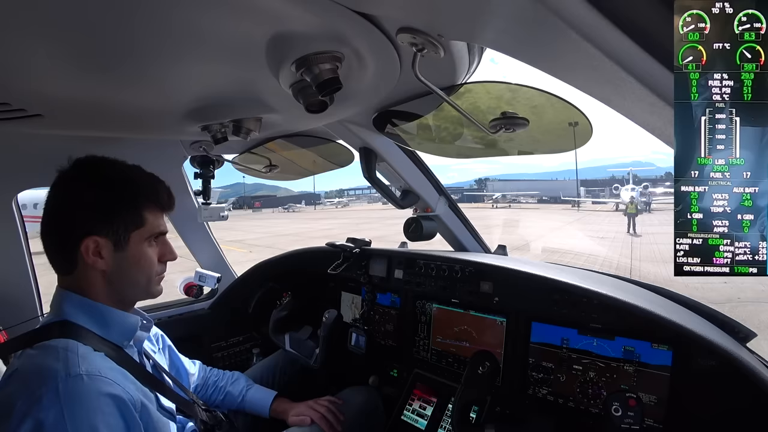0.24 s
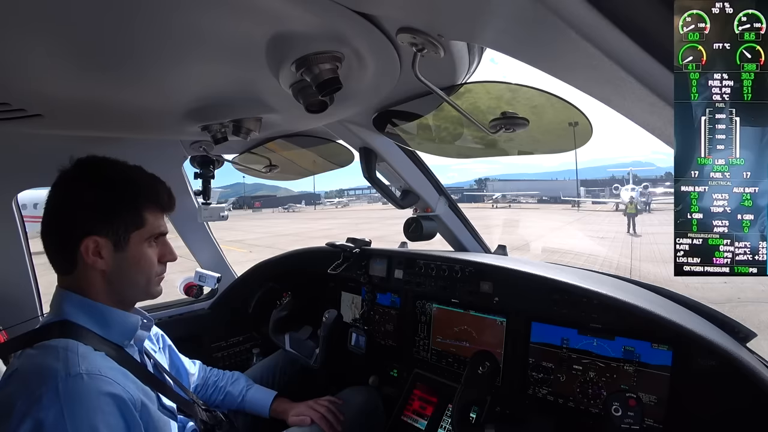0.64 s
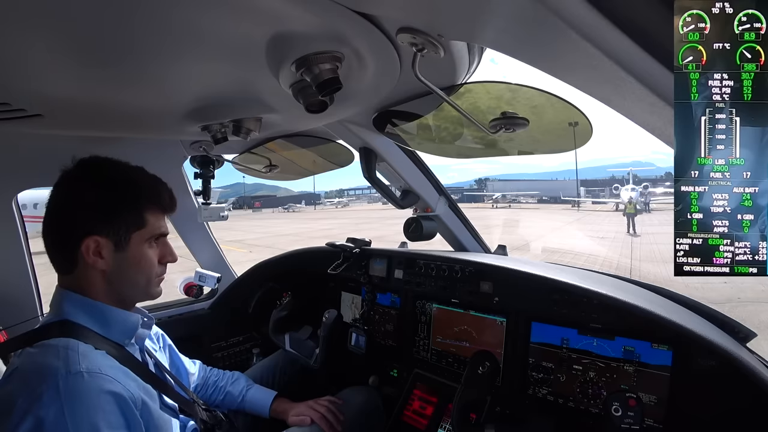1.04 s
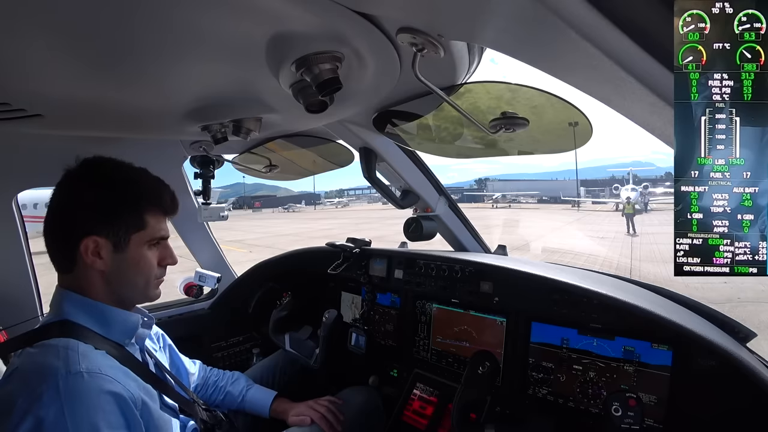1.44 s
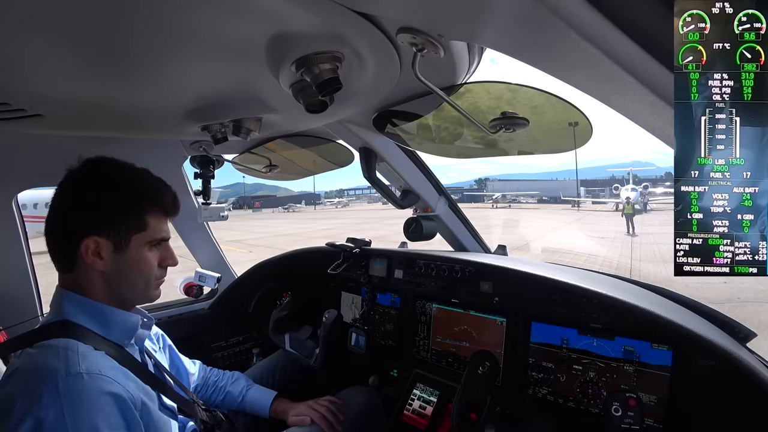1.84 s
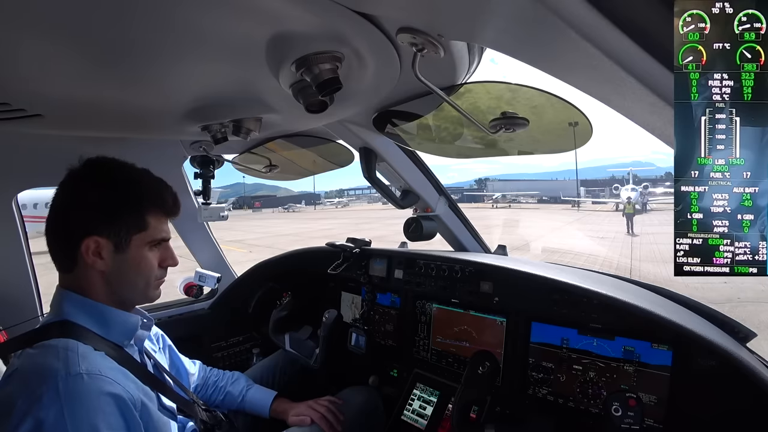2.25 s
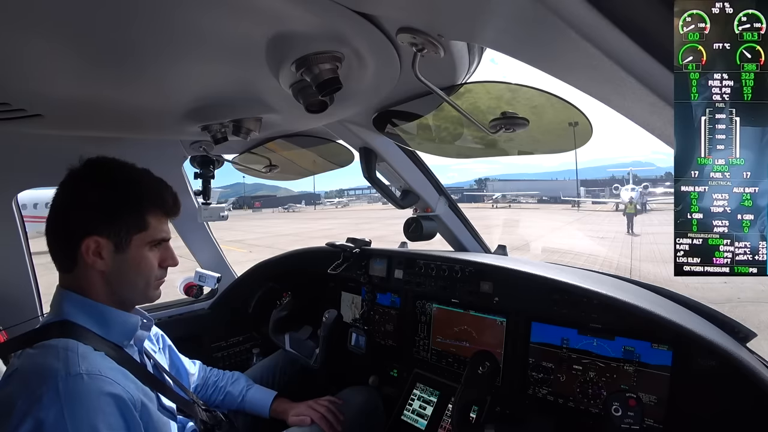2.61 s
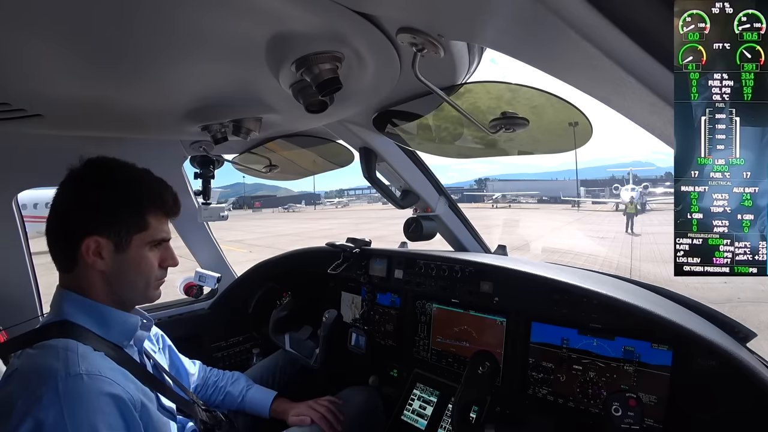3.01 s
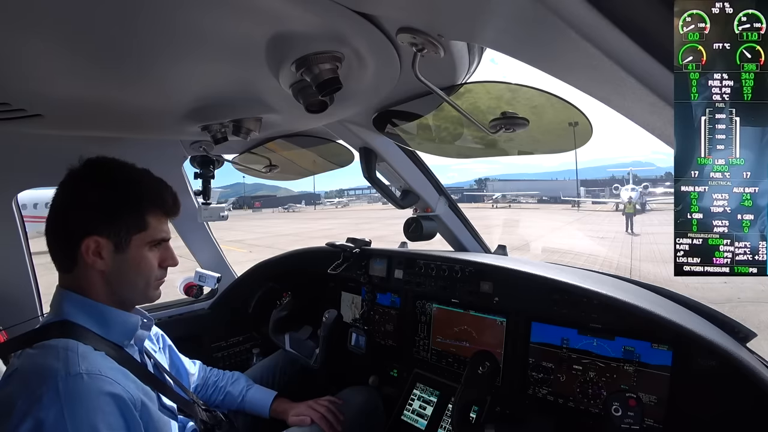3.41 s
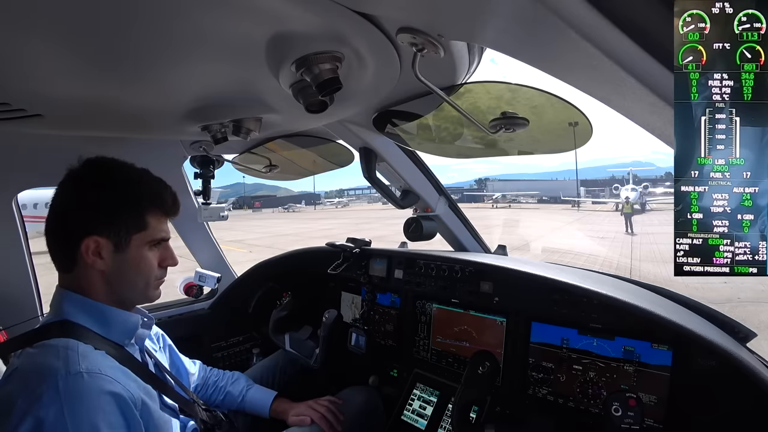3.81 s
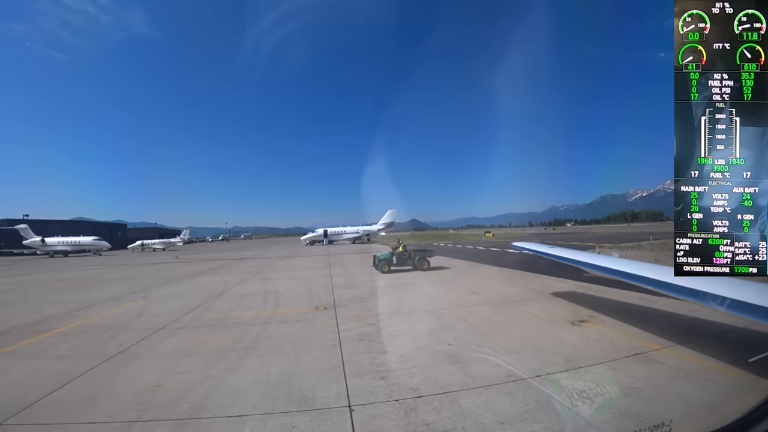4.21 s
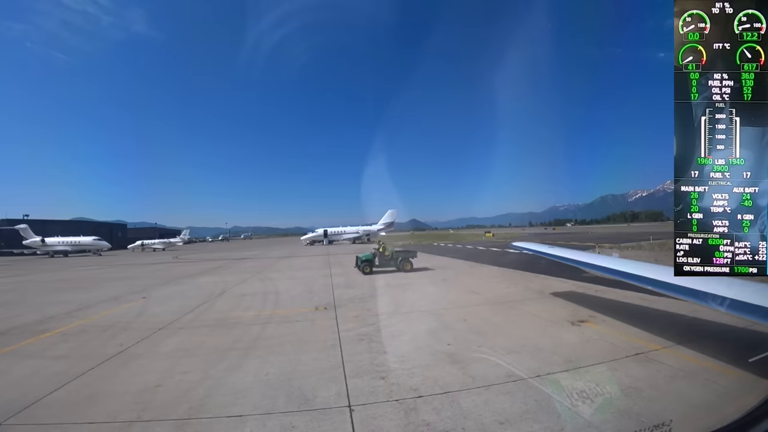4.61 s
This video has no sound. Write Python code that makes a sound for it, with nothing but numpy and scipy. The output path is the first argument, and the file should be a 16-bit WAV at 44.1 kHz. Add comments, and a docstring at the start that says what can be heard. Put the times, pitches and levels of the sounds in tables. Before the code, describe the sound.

Inside a small jet cockpit, a turbine spools up: vents rush, flame rumbles, a thin whine climbs, and a low ragged howl firms into a hum.

```python
"""A turbofan spools up after light-off, heard inside the closed cockpit of a small jet by two close ports.
From the start the flame rumbles through the fuselage, and a filtered rush of noise and gently wavering
sine tones stand for vents and cooling fans. A ragged duct howl near 125 Hz, a noise-modulated tone,
flares briefly. The compressor's thin whine, three gliding sines, climbs throughout, swelling and fading,
and weakens after about 3 s. After 3.5 s the howl firms into a hum, then falls away at the very end."""
import sys
import numpy as np
from scipy import signal
from scipy.fft import rfft, irfft, next_fast_len
from scipy.io import wavfile
from scipy.ndimage import map_coordinates

SR = 44100
rng = np.random.default_rng(int(sys.argv[2]) if len(sys.argv) > 2 else 0)


def store_pcm(level_fs):
    """Save levels as 16-bit WAV."""
    pcm = np.round(np.clip(level_fs, -1, 1) * 32767).astype(np.int16)
    wavfile.write(sys.argv[1], SR, np.atleast_2d(pcm).T)


N = 209955


def amp(db):
    """Decibels to gain."""
    return 10 ** (np.asarray(db) / 20)


def unit(x):
    """Scaled to rms 1 over all channels together."""
    return x / np.sqrt(np.mean(np.abs(x) ** 2) + 1e-20)


def along(points, hz):
    """Curve through (frequency, value) points, straight on a log frequency axis."""
    f, v = np.transpose(points)
    return np.interp(np.log(hz + 1), np.log(f + 1), v)


def curves(rows):
    """One value per sample for each column after the time."""
    times, *columns = np.transpose(rows)
    return [np.interp(np.arange(N) / SR, times, column) for column in columns]


def swells(rows):
    """Smooth bumps from (time, length at half height, dB, ..) rows: one curve for each dB column."""
    t = np.arange(N) / SR
    bumps = 0
    for centre, length, *db in rows:
        shape = 0.5 ** ((2 * (t - centre) / length) ** 2)
        bumps = bumps + np.outer(db, shape)
    return bumps.squeeze()


def wobble(rate):
    """A smooth random curve with rate knots a second."""
    knots = rng.standard_normal(int(N * rate / SR) + 4)
    return map_coordinates(knots, [np.arange(N) * rate / SR])


def filtered(x, response):
    """Sound shaped by a complex response of frequency."""
    m = next_fast_len(N + SR // 2)
    return irfft(rfft(x, m) * response(np.fft.rfftfreq(m, 1 / SR)), m)[..., :N]


def bell(hz, centre, width):
    """Power response of one resonance."""
    return 1 / (1 + (2 * (hz - centre) / width) ** 2)


def turning(hz):
    """Running phase [rad] of a frequency curve, from a random start."""
    return 2 * np.pi * (np.cumsum(hz) / SR + rng.random())


# duct resonance: (time [s], pitch [Hz])
DUCT_PITCH = [(0, 127.7), (1.45, 125.8), (1.75, 121), (2.4, 119), (2.85, 120.1), (3.3, 124), (3.77, 121.3),
              (3.92, 127), (4.12, 123.6), (4.22, 126.2), (4.35, 124.7), (4.53, 130.4), (4.76, 132.8)]
# how hard the flame drives the duct: (time [s], howl level [dB])
FLAME_DRIVE = [(0, -33), (0.6, -32), (1.62, -31), (1.85, -28), (2.15, -26), (2.7, -25), (3.42, -24.5),
               (3.62, -17.5), (4.3, -16), (4.68, -16.5), (4.76, -29.5)]
# the flame flares up or falters: (time [s], length [s], change of the howl [dB])
FLARES = [(0.69, 0.068, 7), (1.1, 0.047, 6), (1.41, 0.037, 9), (1.9, 0.067, 5.5), (3.005, 0.038, 6),
          (3.12, 0.058, 8), (3.24, .06, -3), (3.315, .075, 7), (3.39, .05, -5.5), (4.52, 0.035, -3.5),
          (4.615, 0.02, -8)]
# overtones from the second harmonic up: (level at FULL_DB [dB], noisiness factor, flicker [knots/s])
OVERTONES = [(-39.5, 1.7, 26), (-45, 7.4, 36), (-54, 12, 40)]
# brief changes of tone: (time [s], length [s], second harmonic change [dB], higher ones' change [dB])
HARD_SPELLS = [(1.77, 0.13, 8.5, -2), (2.77, 0.17, 5, 3), (3.08, .16, 6, -3.5), (3.64, .22, 5, 0.5),
               (3.85, 0.089, -7, -6.5), (4.03, .1, 3, 8.5), (4.3, .17, 3, 6.5)]
WAVER_HZ = 0.6
# the howl is half noise, half tone at LOCK_DB and steadies as it grows louder
LOCK_DB, LOCK_SPAN_DB = -28.5, 3.5
# overtones grow with the drive (dB per dB): steeply up to FULL_DB, gently above it
FULL_DB, STEEP, GENTLE = -26, 2.5, 0.36


def howl():
    """The flame drives the duct resonance: a flickering tone steadies and gains overtones as it grows."""
    (hz,), (drive_db,) = curves(DUCT_PITCH), curves(FLAME_DRIVE)
    level_db = drive_db + swells(FLARES)
    noise_to_tone = np.exp((LOCK_DB - level_db) / LOCK_SPAN_DB)  # power ratio
    phase = turning(hz + WAVER_HZ * wobble(14))

    def harmonic(order, noisiness, rate):
        """A steady tone plus its random flicker, in the given power ratio."""
        flicker = unit(wobble(rate) + 1j * wobble(rate))
        swing = (1 + np.sqrt(noisiness) * flicker) / np.sqrt(1 + noisiness)
        return np.sqrt(2) * np.real(swing * np.exp(1j * order * phase))

    over_db = drive_db - FULL_DB
    growth_db = np.minimum(STEEP * over_db, GENTLE * over_db)
    second_db, higher_db = swells(HARD_SPELLS)
    tone = amp(level_db) * harmonic(order=1, noisiness=noise_to_tone, rate=36)
    for order, (db, noisier, rate) in enumerate(OVERTONES, 2):
        spell_db = second_db if order == 2 else higher_db
        overtone = harmonic(order, noisier * np.sqrt(noise_to_tone), rate)
        tone += amp(db + growth_db + spell_db) * overtone
    return tone


# strength of the burning: (time [s], rumble level [dB])
FLAME_LEVEL = [(0, -32.5), (0.8, -31), (1.6, -29), (2.2, -28.5), (2.6, -29.5), (3.45, -28), (3.8, -31),
               (4.76, -28)]
# air modes of the cabin: (centre [Hz], width [Hz], relative level [dB])
CABIN_MODES = [(57, 4.3, -5), (76.6, 9.4, -1), (99, 4.3, -6), (156, 12.2, -0.5), (172.4, 18, -4),
               (194, 14, -18)]
# swells of the airframe shudder: (time [s], length [s], rise [dB])
SHUDDER_SWELLS = [(3.92, 0.3, 10), (4.58, .25, 4.8)]
SHUDDER_DB = -44.5  # between swells


def rumble():
    """Turbulent burning booms in the cabin's air modes and shudders the airframe near 24 Hz."""
    (flame_db,) = curves(FLAME_LEVEL)

    def modes(hz):
        power = sum(amp(db) ** 2 * bell(hz, centre, width) for centre, width, db in CABIN_MODES)
        return np.sqrt(power) / (1 + (hz / 230) ** 8)  # steep treble loss

    boom = unit(filtered(rng.standard_normal(N), modes))
    shudder = np.sqrt(2) * np.sin(turning(24 + 2 * wobble(14)))
    shudder *= amp(2.5 * wobble(12))
    shudder_db = SHUDDER_DB + swells(SHUDDER_SWELLS)
    return amp(flame_db) * boom + amp(shudder_db) * shudder


# compressor speed: (time [s], blade tone [Hz])
BLADE_TONE = [(0, 6615), (1.0, 6868), (2.0, 7165), (3.5, 7680), (4.76, 8130)]
# whine through the fuselage, about level until 3 s, fainter by 4.2 s, then slightly up:
# (time [s], level [dB])
WHINE_LEVEL = [(0, -66), (3.0, -65.5), (3.7, -67.5), (4.2, -74), (4.76, -71.5)]
# the blade tone swells and fades in intake resonances: (time [s], length [s], change [dB])
WHINE_SWELLS = [(0.05, .09, 4), (0.36, .08, 5), (0.45, .05, -9), (0.86, .08, -8), (1.06, .13, 5),
                (1.71, .2, 4.5), (2.32, 0.09, 8), (2.95, .3, 2), (3.18, .07, -10), (3.41, .18, 7),
                (3.58, .08, -6)]
BLADES = 15
LOWER_DB, UPPER_DB = -10, -8  # neighbouring shaft orders, against the whine level
WHINE_FADING_DB, WHINE_FADES_PER_S = 3, 27  # scale of the fading; its knots a second


def whine():
    """Compressor blade tone and its two neighbouring shaft orders fade on their way to each port."""
    (hz,), (level_db,) = curves(BLADE_TONE), curves(WHINE_LEVEL)
    phase = turning(hz + 3 * wobble(40))

    def fading():
        """Independent level changes [dB] at the two ports."""
        return WHINE_FADING_DB * np.array([wobble(WHINE_FADES_PER_S), wobble(WHINE_FADES_PER_S)])

    tones = amp(level_db + swells(WHINE_SWELLS) + fading()) * np.sin(phase)
    for step, db in ((-1, LOWER_DB), (1, UPPER_DB)):
        tones += amp(level_db + db + fading()) * np.sin((1 + step / BLADES) * phase)
    return tones


FAN_HZ = 356.4  # blade rate
# cooling fan: (blade order, level [dB])
FAN_ORDERS = [(1, -49.5), (2, -49.5), (3, -57), (4, -54.5), (5, -65), (6, -66), (9, -69), (12, -73.5)]
# smaller blowers: (pitch [Hz], level before a common 1 dB cut [dB])
BLOWERS = [(274, -52), (479, -51.5), (533, -55), (785, -55), (1226, -57), (1813, -63.5)]


def fans():
    """A cooling fan sings on its blade orders; smaller blowers add their own unsteady tones."""
    phase = turning(FAN_HZ + 0.5 * wobble(12))
    tones = 0
    for order, db in FAN_ORDERS:
        tones = tones + amp(db + 3.8 * wobble(5.86)) * np.sin(order * phase)
    for hz, db in BLOWERS:
        blower = np.sin(turning(hz + 1.61 * wobble(15)))
        tones = tones + amp(db - 1.0 + 2.7 * wobble(6.6)) * blower
    return tones


def walls(x, echo_db, t60):
    """Dense short reflections from windows and panels ripple the spectrum."""
    t = np.arange(SR // 20) / SR
    tail = rng.standard_normal(len(t)) * amp(-60 * t / t60)
    tail *= t > 0.006  # first reflections arrive after 6 ms
    return x + amp(echo_db) * signal.fftconvolve(x, tail / np.linalg.norm(tail))[:N]


# strength of the air flow: (time [s], level [dB])
FLOW_LEVEL = [(0, -35.5), (1.2, -35), (3.3, -34.5), (4.76, -35)]
# colour of the air in the vents: (frequency [Hz], relative spectral level [dB])
AIR_COLOUR = [(150, -17), (215, 4), (280, 0.5), (318, -4.5), (400, -1), (600, -3), (820, 0), (1120, -3.5),
              (1220, -7.5), (1700, -10.5), (2800, -18.5), (5000, -24.5), (7500, -29.5), (8800, -34),
              (11000, -35)]
# vent and panel resonances and dips: (centre [Hz], width [Hz], change [dB])
VENT_RESONANCES = [(346, 39, 8.5), (409, 19, 4), (478, 9.8, 3.5), (586, 30, 0.5), (750, 33, -4),
                   (760, 34, -2), (1057, 135, 4), (1306, 46, 4), (1448, 132, 6), (1554, 110, -4.5),
                   (1760, 100, 1.5), (1956, 76, 4.5), (2070, 64, -2), (2424, 200, 4.5), (3290, 200, 4),
                   (4310, 130, 3)]
# likeness of the rush at the two ports: (frequency [Hz], likeness [0-1])
PORT_LIKENESS = [(100, 0.95), (250, 1), (500, 0.89), (1100, 0.9), (2200, 0.58), (3500, 0.67), (10000, 0.67)]


def vents():
    """Air rushes through the vents as coloured noise; its treble is diffuse in the cockpit."""
    def colour(hz):
        resonances_db = sum(db * bell(hz, centre, width) for centre, width, db in VENT_RESONANCES)
        gain = amp(along(AIR_COLOUR, hz) + resonances_db)
        # share between mid and side that gives the wanted likeness
        turn = np.arccos(np.clip(along(PORT_LIKENESS, hz), -1, 1)) / 2
        return gain * np.array([np.cos(turn), np.sin(turn)])

    noises = rng.standard_normal((2, N))
    flow = np.array([walls(noise, echo_db=-13.0, t60=0.071) for noise in noises])
    mid, side = filtered(flow, colour)
    (flow_db,) = curves(FLOW_LEVEL)
    return amp(flow_db + 0.32 * wobble(6.05)) * unit(np.array([mid + side, mid - side]))


# vent whistles: (pitch [Hz], scale of the wander [Hz], level [dB])
WHISTLES = [(1069, 35, -54.5), (1460, 30, -56)]


def whistles():
    """Air sheds eddies at the vent louvres: faint tones that wander and flutter."""
    tones = 0
    for hz, wander, db in WHISTLES:
        tone = np.sin(turning(hz + wander * wobble(16)))
        tones = tones + amp(db + 2.7 * wobble(22)) * tone
    return tones


def scene():
    """Engine behind the fuselage wall, fans and vents inside the cockpit."""
    return howl() + rumble() + whine() + fans() + vents() + whistles()


# phase between the two microphone ports: (frequency [Hz], left lead [rad])
PORT_LEAD = [(40, 0.04), (90, 0.1), (125, 0.71), (185, 1.25), (380, 1.48), (700, 1.2), (1300, 1.07),
             (2200, 0.8), (3300, 0.6), (7500, .4), (10500, .05)]
# level between the two microphone ports: (frequency [Hz], left minus right [dB])
PORT_TILT = [(35, .3), (85, -0.5), (112, -6), (150, -4.5), (205, 4.5), (250, -2.5), (310, 5.5), (380, 5.5),
             (800, 4), (1150, 2), (1300, 0), (3300, -2), (5800, -4), (9500, -1.2)]
TOP_HZ = 11000


def record(dry):
    """Two close ports turn the sound's direction into phase and level differences; treble is cut."""
    def ports(hz):
        half = amp(along(PORT_TILT, hz) / 2) * np.exp(1j * along(PORT_LEAD, hz) / 2)
        pair = np.array([half, 1 / half])
        return pair / np.abs(pair.mean(axis=0))  # the mean of the ports keeps its level

    return filtered(filtered(dry, ports), lambda hz: hz < TOP_HZ)


dry = scene()
out = record(dry)
store_pcm(out)
```